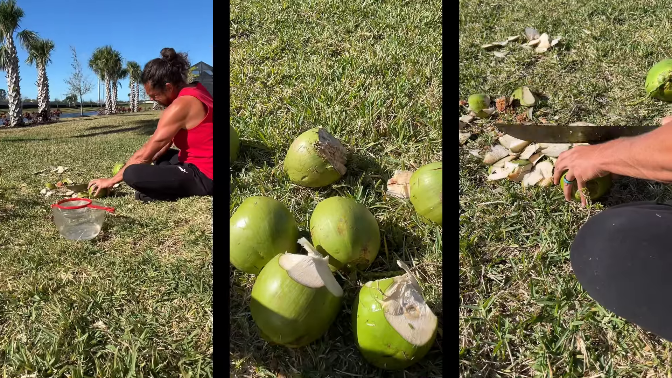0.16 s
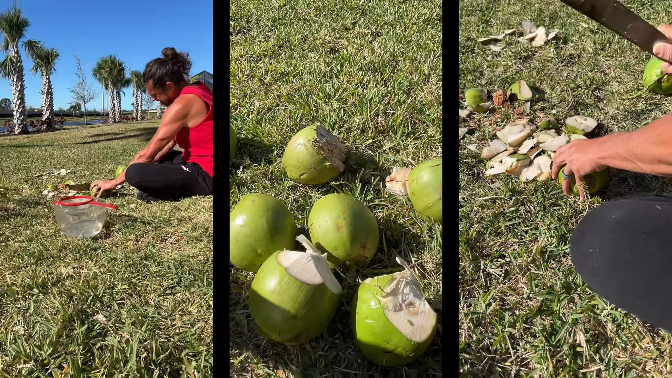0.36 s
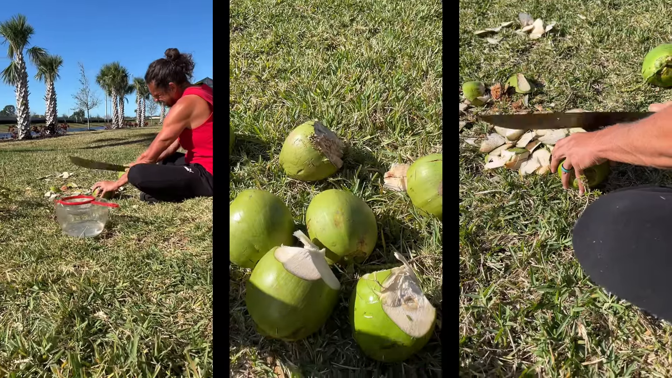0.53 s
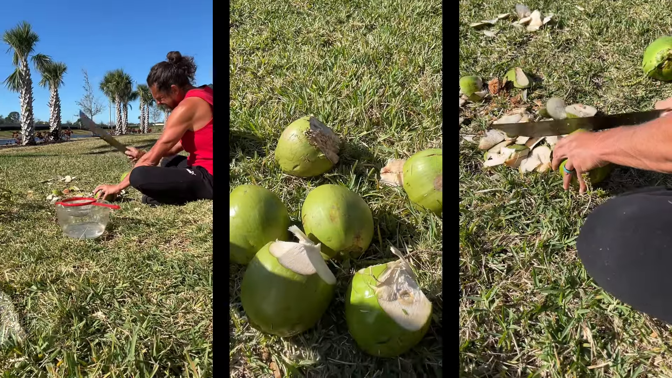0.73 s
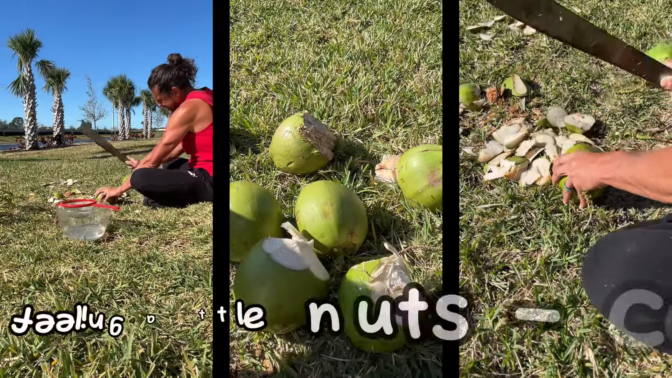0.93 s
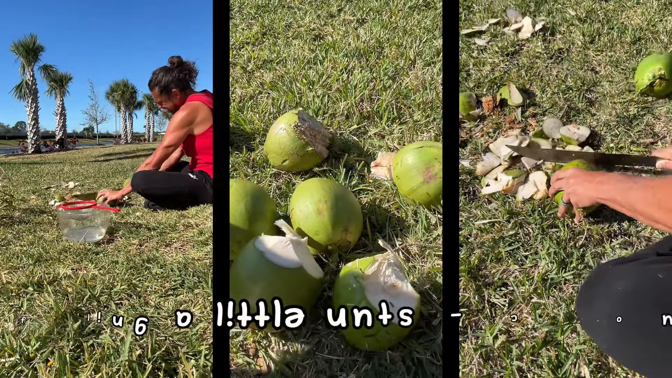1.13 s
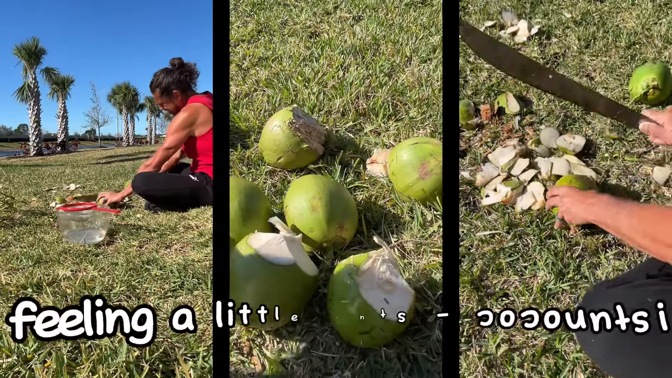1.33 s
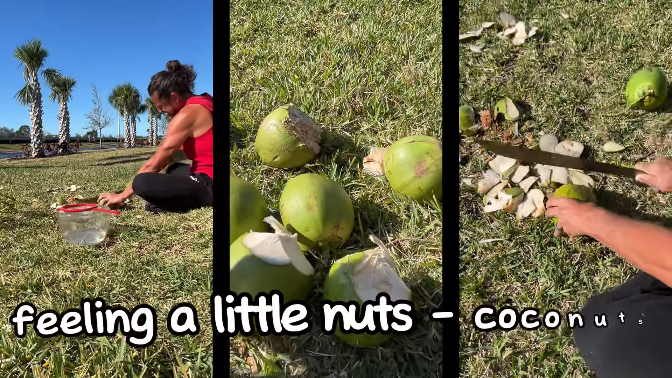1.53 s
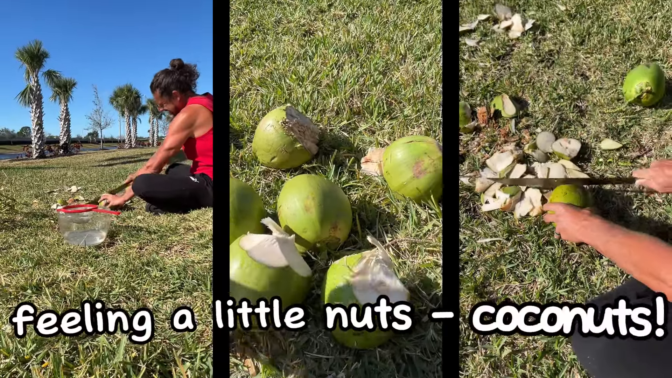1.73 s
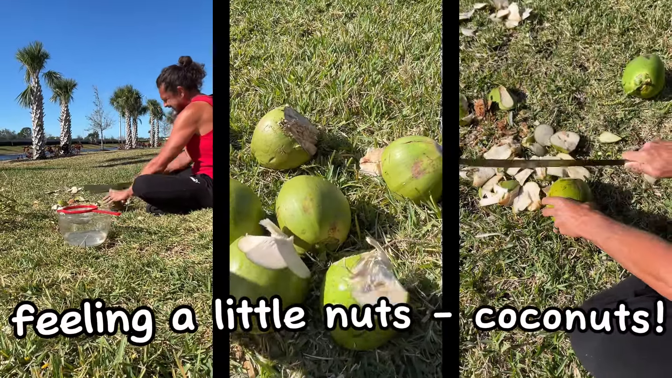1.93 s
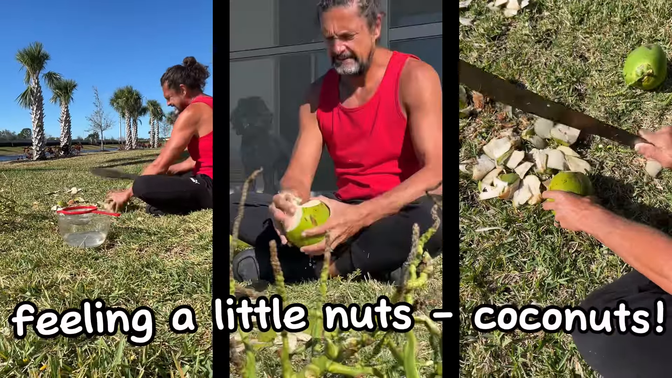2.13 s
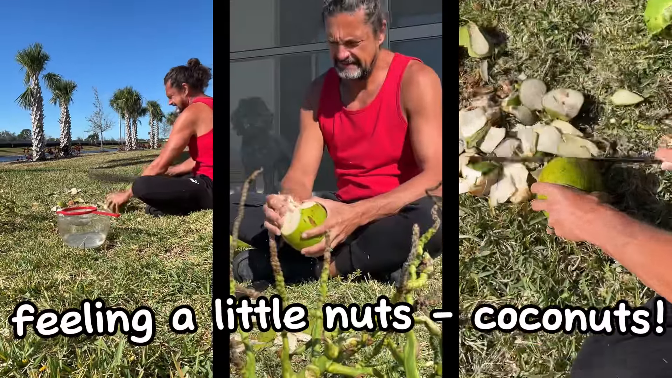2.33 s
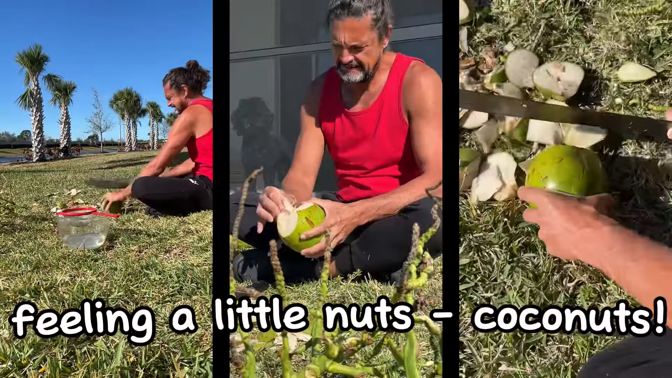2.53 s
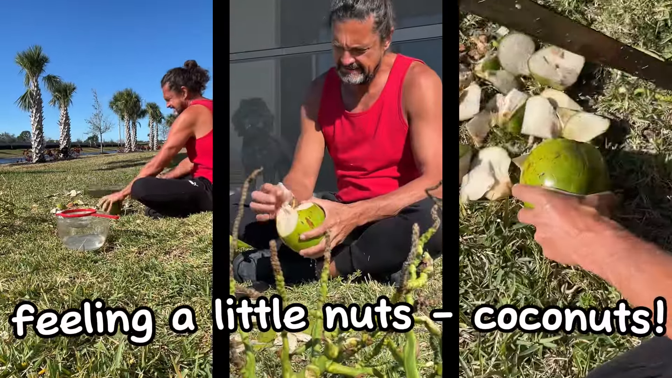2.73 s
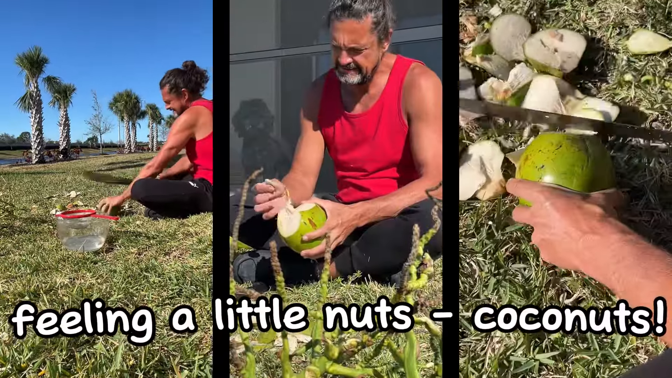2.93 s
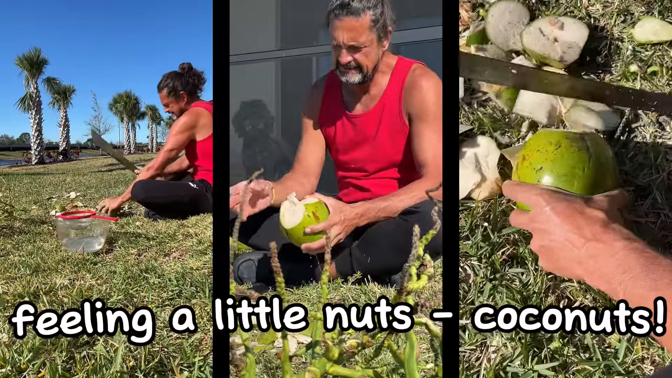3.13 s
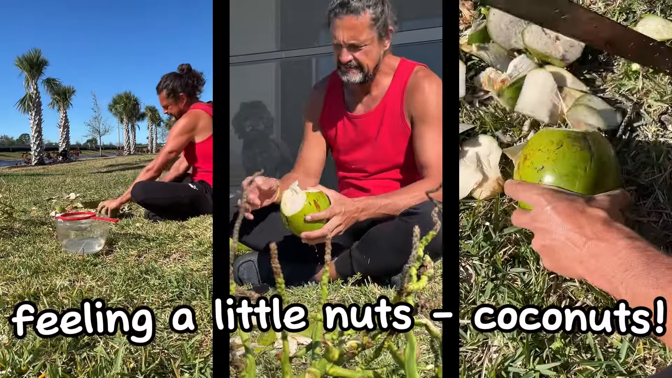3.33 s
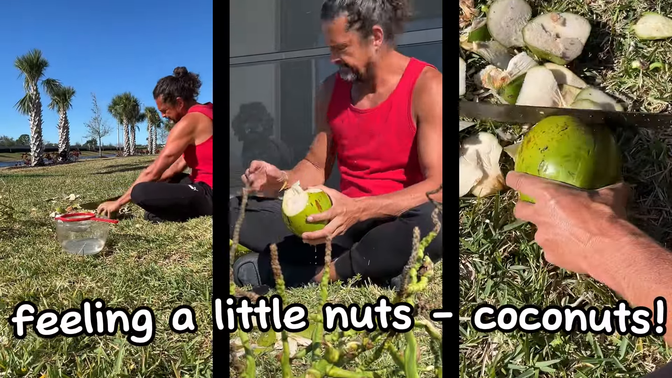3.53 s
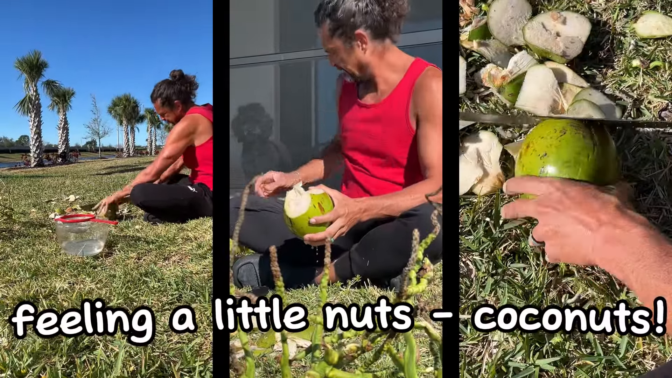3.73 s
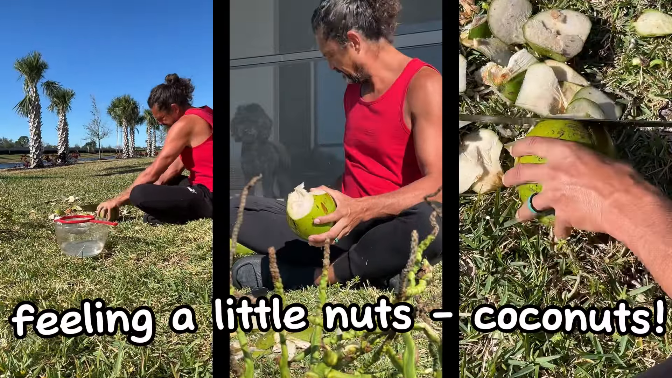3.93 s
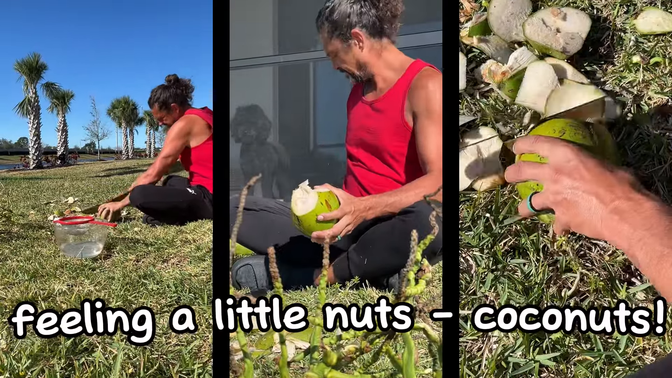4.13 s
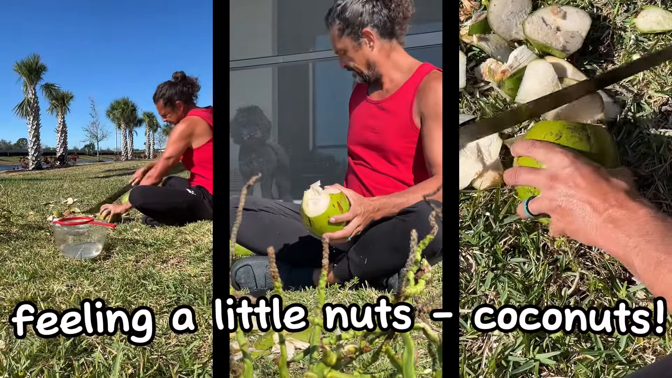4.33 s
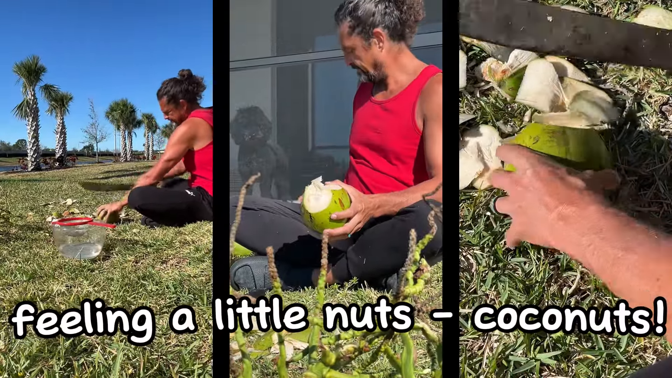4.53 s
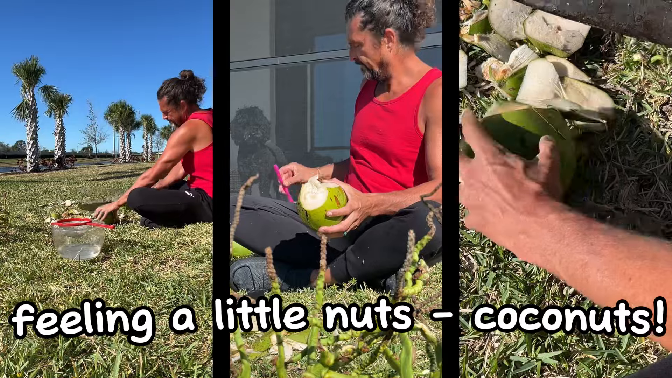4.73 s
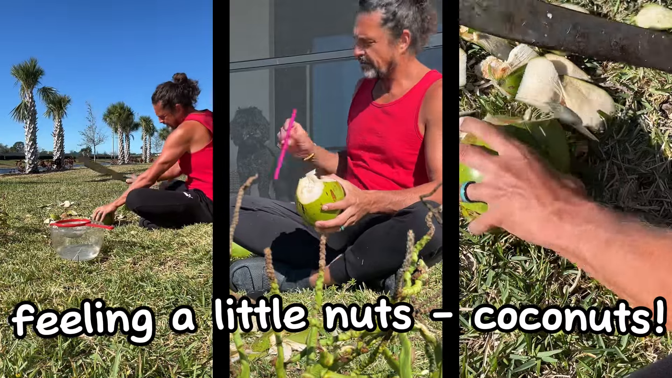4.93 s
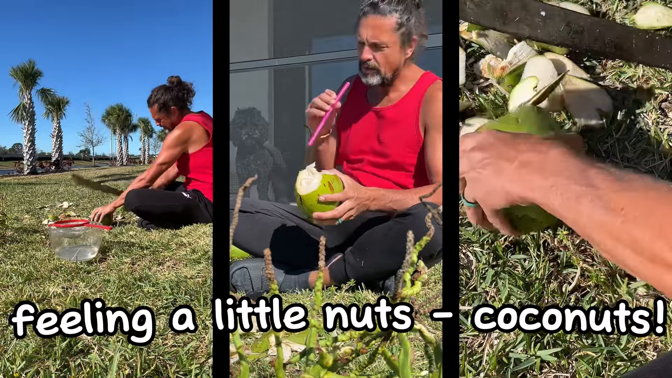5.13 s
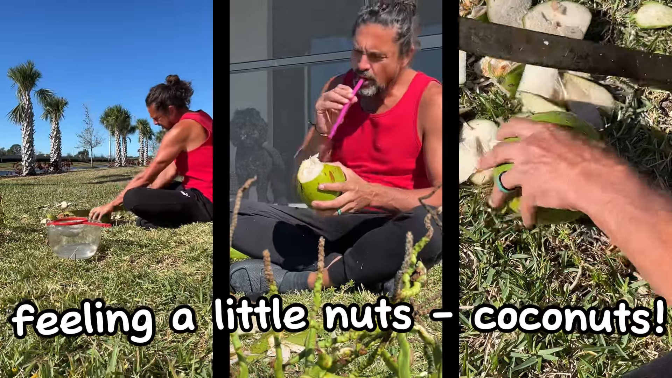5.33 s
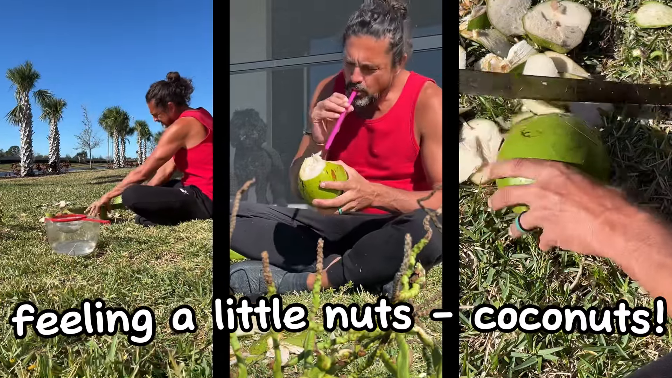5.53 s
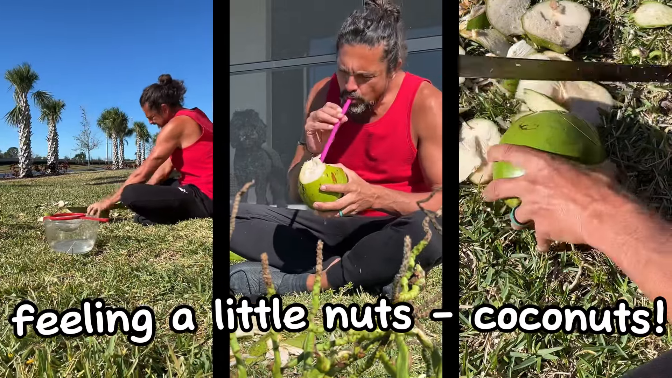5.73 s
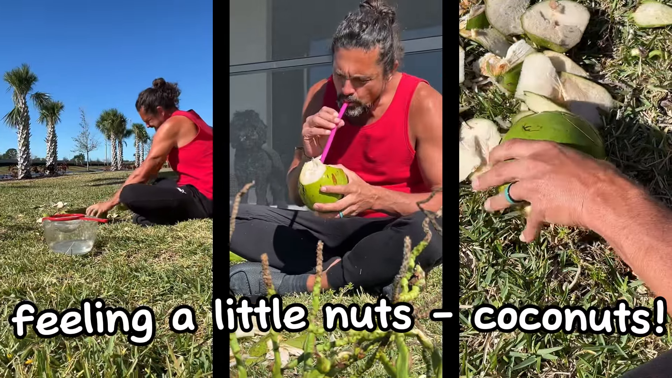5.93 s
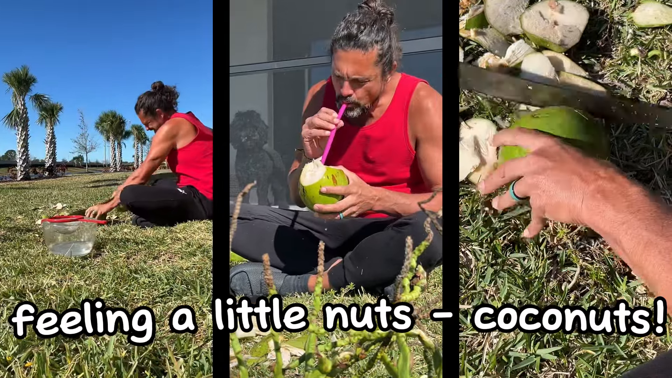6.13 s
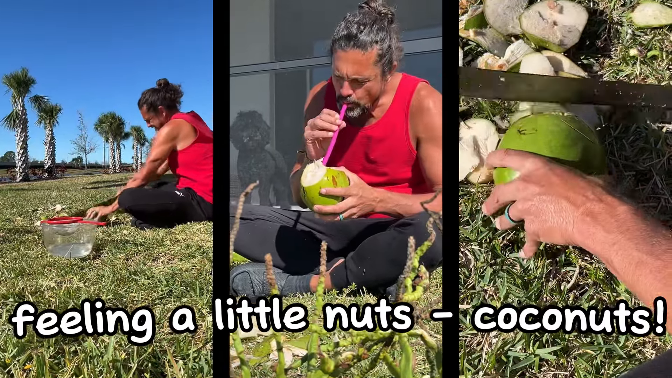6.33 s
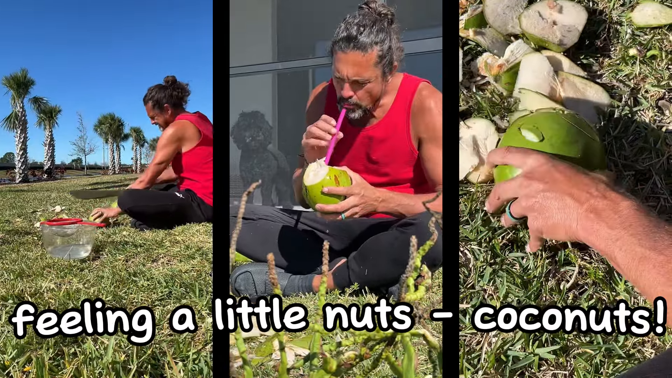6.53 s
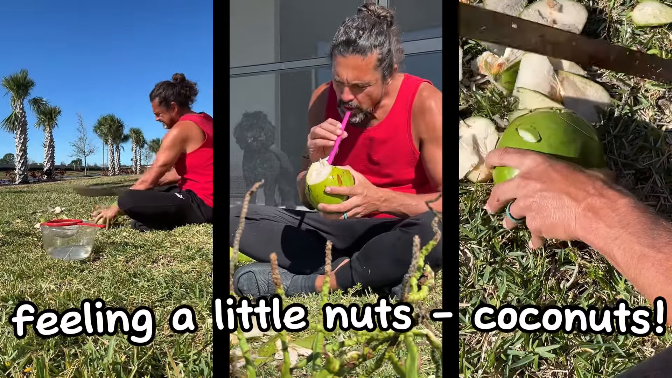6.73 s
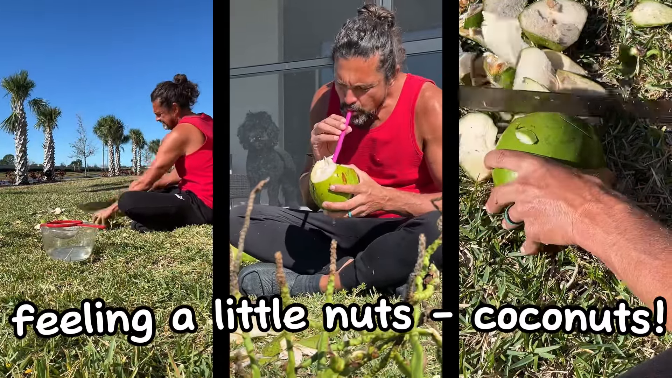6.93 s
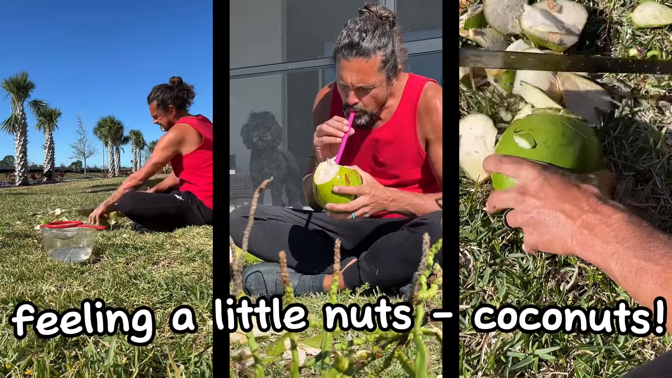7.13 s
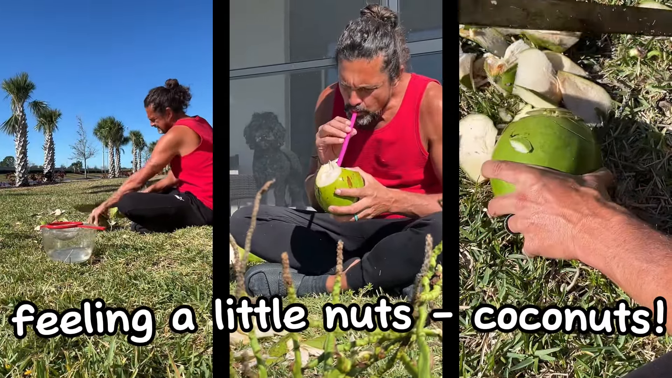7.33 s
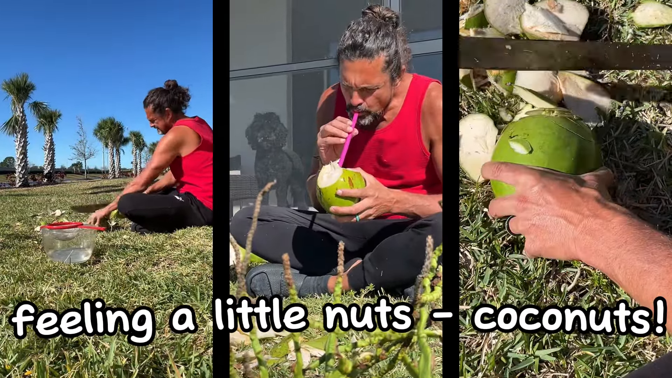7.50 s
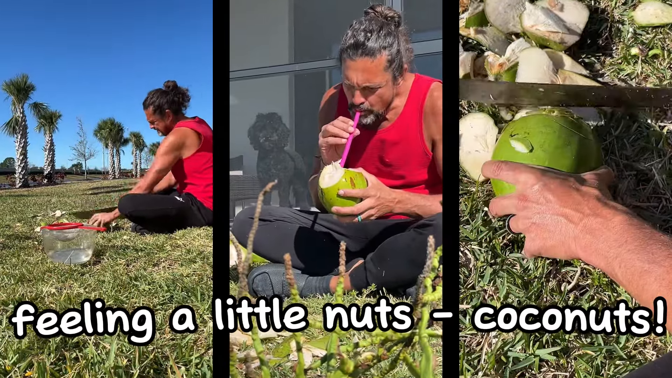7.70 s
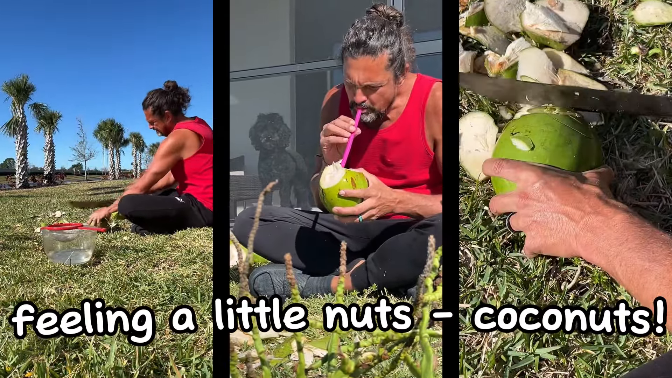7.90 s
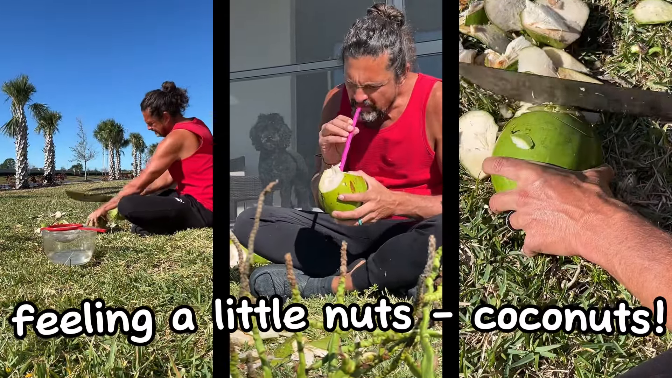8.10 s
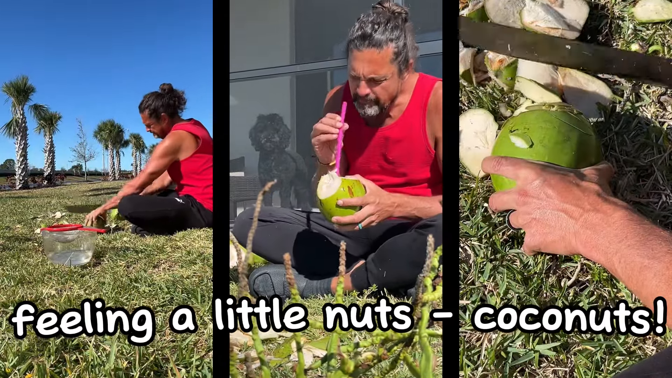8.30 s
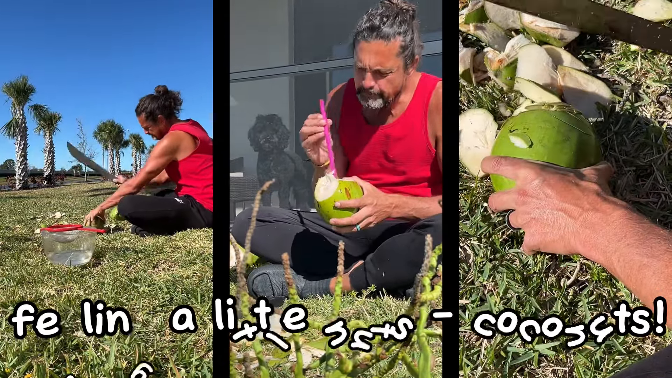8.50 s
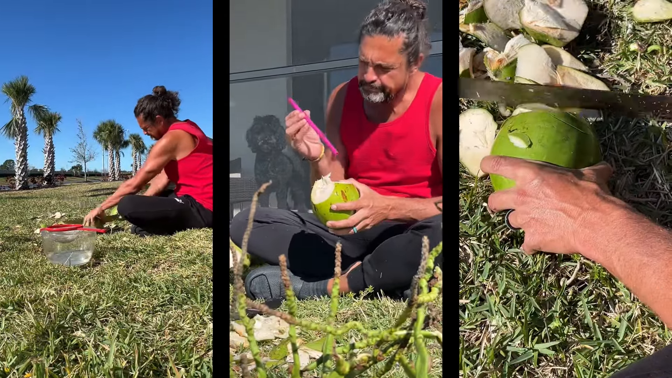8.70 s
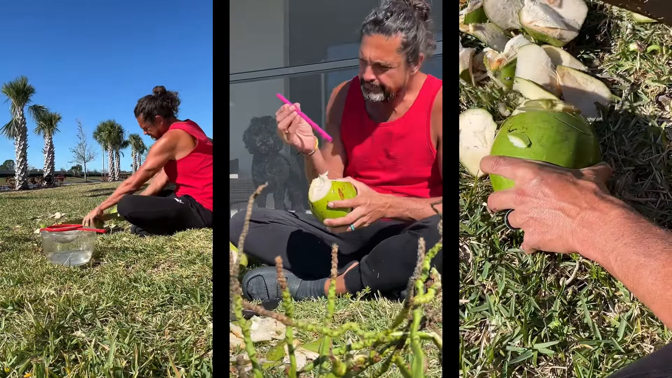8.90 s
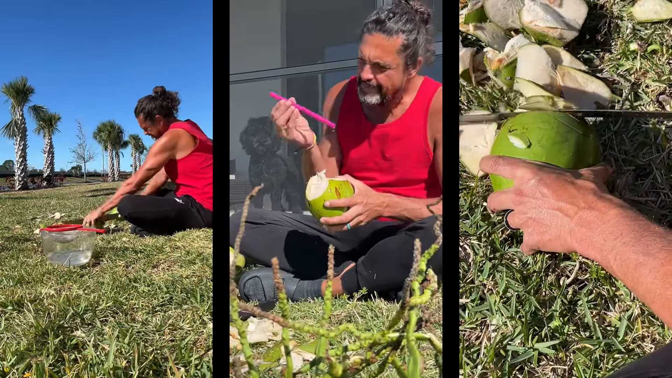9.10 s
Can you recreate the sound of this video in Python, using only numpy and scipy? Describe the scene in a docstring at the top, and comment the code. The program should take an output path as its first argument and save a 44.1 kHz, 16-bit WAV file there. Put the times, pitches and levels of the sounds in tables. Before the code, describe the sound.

A machete chops a green coconut on grass, close to the microphone, over a low wind rumble and soft outdoor hiss. Each strike is a short crunch of snapping fibres with a hollow knock. Two quick chops open, followed by a hard one at 0.5 seconds, a lighter pair around 1, and another hard one at 1.6. More land at 2.3, 2.9, 3.3 and 3.4, with the nut thudding against the ground. From 4 to 5 seconds, chips rustle and tick quietly. A light chop comes at 5.2, a firmer one with a faint steel ring at 6.1, and a hard one at 6.8. Wind buffets the microphone from 7.3 to 7.8 while the blade chatters and rings faintly. Light cuts follow around 8.7, then a last hard, hollow chop at 9.1. Very faint distant hums come and go.

```python
"""A steel machete chops green coconut husks on a lawn, close to a two-port phone microphone.
Each chop bites the skin, then wedges the husk apart: surges of snapping fibres that knock the hollow nut.
Some blows ring the blade or rock the nut against the ground, and chips break away, tick and rustle.
Underneath, wind rumbles on the microphone and faint hums come and go in a soft outdoor hiss.
"""
import sys
import numpy as np
from scipy import signal
from scipy.fft import rfft, irfft, next_fast_len
from scipy.io import wavfile
from scipy.ndimage import uniform_filter1d

SR = 44100
rng = np.random.default_rng(int(sys.argv[2]) if len(sys.argv) > 2 else 0)


def dump_mix(stems):
    """Bounce the given channels to the path in sys.argv[1] as a 16-bit WAV at rate SR."""
    frames = np.atleast_2d(stems).T  # one column per channel
    limited = np.clip(frames, -1, 1)  # hard clip at full scale
    pcm = np.round(limited * 32767).astype(np.int16)
    wavfile.write(sys.argv[1], SR, pcm)


N = 403779

# The hollow nut's modes. Each row: pitch in Hz, level in dB, time to fall 60 dB in seconds.
NUT_MODES = [(179.3, 0, 0.049), (313, -2, 0.042), (519.4, -2.5, 0.039), (729.5, 2, 0.025), (1177, 0, 0.022),
             (1690, -2.5, 0.012), (2260, -4, 0.03), (2834, 7, 0.035)]


def gain_of(db):
    """Decibels to a factor."""
    return 10 ** (np.asarray(db) / 20)


def unit_rms(x):
    """Scales to rms 1."""
    return x / np.sqrt(np.mean(x ** 2) + 1e-20)


def spectrum_at(points, hz):
    """Reads a spectrum table at hz, along a log frequency axis."""
    f, value = np.transpose(points)
    return np.interp(np.log(hz + 1), np.log(f + 1), value)


def envelope(points):
    """Joins (seconds, value) points with straight lines across the scene."""
    return np.interp(np.arange(N) / SR, *np.transpose(points))


def add(mix, start, sound):
    """Mixes a sound in at start seconds."""
    part = mix[round(start * SR):][:len(sound)]
    part += sound[:len(part)]


def coloured(x, eq):
    """Minimum-phase EQ that keeps the level of white noise."""
    log_gain = np.log(gain_of(spectrum_at(eq, abs(np.fft.fftfreq(4096, 1 / SR)))))
    taps = np.fft.ifft(np.exp(np.conj(signal.hilbert(log_gain)))).real[:1024]
    return signal.oaconvolve(x, taps / np.linalg.norm(taps))[:len(x)]


def resonate(x, hz, width_hz):
    """Band-pass: shifts hz down to zero, smooths twice and shifts back."""
    carrier = np.exp(2j * np.pi * np.cumsum(hz * np.ones(x.shape[-1])) / SR)
    pole = np.exp(-np.pi * width_hz / SR)
    return 2 * (carrier * signal.lfilter([1], np.poly([pole, pole]), x / carrier)).real


def struck(modes, tilt_db, spread_db, detune, swell_hz):
    """A body's decaying modes after one blow; where it lands changes their shares."""
    hz, db, t60 = np.transpose(modes)[:, :, None]
    t = np.arange(SR // 2) / SR
    level_luck, pitch_luck = rng.standard_normal((2, len(modes), 1))
    db = db + tilt_db * np.log2(hz / hz.mean()) + spread_db * level_luck
    swell = (1 - np.exp(-t * hz ** 2 / swell_hz)) ** 2  # low modes take longer to get going
    tones = np.sin(2 * np.pi * hz * (1 + detune * pitch_luck) * t)
    return (gain_of(db - 60 * t / t60) * swell * tones).sum(0)


def snaps(samples, per_s, spread_db):
    """A dense hail of clicks of uneven size."""
    hit, size, sign = rng.random((3, samples))
    strength = gain_of(-spread_db * np.log(size + 0.00041))
    return unit_rms((hit < per_s / SR) * strength * np.sign(sign - .5))


def hiss():
    """Soft, patchy background hiss, alike in left and right in some frequency bands, wide in others."""
    # Tone of the hiss. Each row: frequency in Hz, level in dB.
    eq = [(60, -10.5), (200, -11.5), (400, -15), (800, -14), (2000, -17), (5000, -20), (6500, -26.5),
          (12300, -28), (13500, -38), (14200, -48)]
    # Its slow fade. Each row: time in seconds, level in dB.
    fade = [(0.0, -47.5), (8.64, -52.5), (9.16, -52.5)]
    # Each row: frequency in Hz, left-right correlation from wide (0) to identical (1).
    band_correlation = [(100, 1), (300, 0.63), (700, 0.56), (1800, 0.2), (3000, 0.33), (5000, 0.33),
                        (6100, 1), (7500, 0.11), (8500, .99), (9600, 0.86), (10800, 0.21), (12000, 1),
                        (15000, 1)]
    frames, hz = N // 256 + 5, np.fft.rfftfreq(1024, 1 / SR)
    left_re, left_im, apart_re, apart_im, patches = rng.standard_normal((frames, 513, 5)).T
    patches = unit_rms(uniform_filter1d(uniform_filter1d(patches, 12, 0), 14, 1))
    shared = spectrum_at(band_correlation, hz)[:, None]
    left = left_re + 1j * left_im
    right = shared * left + np.sqrt(1 - shared ** 2) * (apart_re + 1j * apart_im)
    spectra = np.array([left, right]) * gain_of(spectrum_at(eq, hz)[:, None] + 1.1 * patches)
    noise = signal.istft(spectra, nperseg=1024, noverlap=768)[1][:, :N]
    return gain_of(envelope(fade)) * unit_rms(noise)


def hums():
    """Fuzzy far tones: narrow bands of noise that fade in and out."""
    # Each row is a hum: start and end in seconds, pitch and width in Hz, level in dB.
    tones = [(1.194, 2.2, 664, 120, -63), (3.435, 4.96, 660, 120, -62), (5.195, 5.664, 873, 140, -59),
             (7.163, 7.614, 867, 90, -58.5), (7.499, 7.75, 805, 170, -54)]
    out = np.zeros(N)
    for start, end, hz, width_hz, db in tones:
        noise = rng.standard_normal(2 * SR)[:round((end - start) * SR)]
        tone = unit_rms(resonate(noise, hz, width_hz))
        add(out, start, gain_of(db) * tone * signal.windows.tukey(len(tone), .4))
    return out


def wind():
    """Low lumpy rumble, brighter buffeting and single puffs; the eddies differ a little per port."""
    # Strength of the wind. Each row: time in seconds, rumble level in dB.
    strength = [(0.0, -50), (0.12, -47.5), (3.57, -43), (7.09, -44), (7.4, -37), (7.75, -37.5),
                (7.95, -44.5), (8.85, -44), (9.16, -39.5)]
    # Puffs that rock the membrane. Each row: start in seconds, level in dB, pitch in Hz,
    # length in cycles, overtones from 0 to 1.
    puff_cues = [(.513, -31.5, 112, 1.4, 0.5), (1.734, -31.5, 71, 2.8, 0.05), (3.999, -31, 70, 3.1, 0.06),
                 (7.327, -19.5, 74.8, 4, 0.78), (7.38, -21.5, 81, 1.7, 0), (7.55, -34, 94, 1.8, 0.26),
                 (7.657, -23, 91, 1.48, 0), (7.752, -34.5, 127.4, 2.6, 1)]
    eddies = rng.standard_normal((2, 1, N)) + 0.095 * rng.standard_normal((2, 2, N))
    rumble = unit_rms(resonate(eddies[0], hz=68.7, width_hz=58.3))
    buffet = unit_rms(resonate(eddies[1], hz=126, width_hz=105))
    bed = gain_of(envelope(strength)) * (rumble + gain_of(-7.5) * buffet)
    puffs = np.zeros(N)
    for start, db, hz, cycles, richness in puff_cues:
        phase = 2 * np.pi * hz * np.arange(0, cycles / hz, 1 / SR)
        overtones = sum(np.exp(-k * phase / 30) * 0.75 ** (k - 2) * np.sin(k * phase + 1.56 * (k - 1))
                        for k in range(2, 7))
        swing = np.sin(phase) + richness * overtones
        add(puffs, start, gain_of(db) * swing * signal.windows.tukey(len(phase), .6))
    left_puffs = np.roll(puffs, round(.0007 * SR))  # a puff sweeps over the right port first
    return bed + np.array([left_puffs, puffs])


def rustles():
    """Chips and grass, moved by hand or blade, give dry clicks in clumps."""
    # Each row is a rustle: start and length in seconds, level in dB.
    moves = [(0.78, 0.22, -54.5), (1.677, 0.23, -52.5), (2.914, 0.15, -54.5), (3.995, 0.22, -44.5),
             (5.138, 0.2, -51), (6.267, 0.092, -54.5), (7.56, 0.31, -55)]
    # Tone of the rustle. Each row: frequency in Hz, level in dB.
    eq = [(500, -11), (1500, 3.5), (3900, 9), (6000, 1), (11000, 6), (13500, 1), (15500, -9)]
    rise_share = 0.34
    level = sum(gain_of(db) * envelope([(s, 0), (s + rise_share * length, 1), (s + length, 0)]) ** .5
                for s, length, db in moves)
    clumps = gain_of(2.0 * unit_rms(uniform_filter1d(rng.standard_normal(N), 200)))
    return level * unit_rms(coloured(clumps * snaps(N, per_s=6000, spread_db=2.0), eq))


def ticks():
    """Chips and stalks tick: a few damped cycles with a spit of noise around the same pitch."""
    # Each row is a tick: start in seconds, level in dB, pitch in Hz.
    cues = [(0.357, -28.5, 1830), (0.897, -32.5, 4130), (0.97, -35, 7900), (0.976, -36, 5170),
            (1.145, -32, 3340), (1.467, -38, 4600), (2.387, -33, 1090), (4.292, -30, 2230),
            (4.711, -37, 1220), (5.302, -41, 6100), (7.497, -39.5, 6000), (7.555, -39, 5000),
            (7.68, -33, 11200)]
    out, t = np.zeros(N), np.arange(SR // 50) / SR
    attack = 1 - np.exp(-t / 0.00036)
    for start, db, hz in cues:
        spit = 0.86 * unit_rms(resonate(rng.standard_normal(len(t)), hz, 1.47 * hz))
        partials = sum(np.sin(2 * np.pi * ratio * hz * t) for ratio in (.55, .78, 1.02, 1.3)) / 2
        add(out, start, gain_of(db - 60 * t / 0.012) * attack * (partials + spit))
    return out


def blade_chatter():
    """The resting blade chatters faintly: a quick run of tiny high knocks, accented at the start."""
    start_s, end_s, per_s, db, hz = 7.313, 7.46, 51.5, -47, 9000
    out, t = np.zeros(N), np.arange(SR // 100) / SR
    for s, (size, pitch) in zip(np.arange(start_s, end_s, 1 / per_s), rng.standard_normal((20, 2))):
        level_db = db + 4.4 * np.exp(-(s - start_s) / .015) + 1.5 * size
        tone = np.sin(2 * np.pi * hz * (1 + .03 * pitch) * t)
        add(out, s, gain_of(level_db - 60 * t / 0.0078) * tone)
    return out


def blade_ring():
    """The steel rings on after a blow, most near the pitch that the blow favours."""
    # Each row is a blow: start in seconds, level in dB, contact from edge (0) to flat (1),
    # favoured pitch in Hz, freedom to ring on from 0 to 1.
    blows = [(.066, -52.5, 0, 2500, .22), (0.59, -57, 0, 2500, 0.16), (3.414, -58, 0, 2500, 0.2),
             (6.111, -49, 0, 2500, 1), (6.301, -50, .7, 3500, 1), (6.79, -57, 0, 2500, 0.7),
             (7.588, -40, 0.9, 7500, .55), (7.683, -44, 1, 8800, 1), (7.756, -51, .9, 3700, 1),
             (8.207, -50, 0.9, 8800, 0.2), (8.622, -47, .8, 8000, .5)]
    # The pitch of each blade mode in Hz.
    mode_hz = [2498, 2501.5, 2990, 3528, 4590, 5105, 6535, 7243, 8008, 8790, 9605, 10450, 11285, 13730,
               15180]
    # The same modes. Each row: level in dB struck on the edge, level in dB struck on the flat,
    # time to fall 60 dB in seconds when ringing freely.
    mode_response = [(3, -8, 1.1), (0, -10, 1.1), (-20, -6, 0.3), (-12, -4, 0.3), (-14, -7, .3),
                     (-20, -7, 0.3), (-10, -12, .35), (-10, -9, 0.3), (-15, -12, 0.35), (-25, 8, 0.17),
                     (-8, -7, 0.2), (-20, -3, 0.13), (-15, -3, 0.11), (-5, -3, .15), (-15, -10, .15)]
    edge_db, flat_db, t60 = np.transpose(mode_response)
    focus_db_per_octave = 6.0
    out = np.zeros(N)
    for start, db, flat, favoured_hz, freedom in blows:
        octaves_away = abs(np.log2(np.divide(mode_hz, favoured_hz)))
        mode_db = edge_db + flat * (flat_db - edge_db) - focus_db_per_octave * octaves_away
        modes = np.transpose([mode_hz, mode_db, freedom * t60])
        add(out, start, gain_of(db) * struck(modes, 0, spread_db=3.5, detune=0.00016, swell_hz=8000))
    return out


def nut_thuds():
    """The nut rocks against the ground: soft blows that wake its low, hollow modes."""
    # Each row is a thud: start in seconds, peak in dB, brightness in dB per octave.
    cues = [(0.173, -27, -1), (0.565, -35, -33), (2.873, -27.5, -5), (2.908, -28, 9), (3.264, -29, -4),
            (3.413, -28.5, -7.5), (4.296, -43, 6), (4.712, -37, -6.5), (5.187, -29, -5), (6.118, -29, -4),
            (6.298, -52, 8), (6.775, -28.5, -3), (7.555, -38, -1), (7.761, -32, -15), (9.126, -29, -29)]
    out, soft_blow = np.zeros(N), np.hanning(60)
    for start, db, tilt_db in cues:
        ring = struck(NUT_MODES, tilt_db, spread_db=5.0, detune=0.042, swell_hz=423)
        knock = signal.oaconvolve(soft_blow, ring)
        add(out, start, gain_of(db) * knock / abs(knock).max())
    return out


def fibre_surge(db, length, t60, treble_db, knock_db, knock_hz, crack_db):
    """One burst of snapping fibres: feeds for its body, treble and crack, and its knock on the nut."""
    parting_t60_s, strands_db, focus_db_per_octave = 0.013, -13, 5.0
    t = np.arange(SR // 10) / SR
    # The tearing stops quickly; loose strands crackle on below it.
    parting = gain_of(-60 * np.maximum(t - length, 0) / parting_t60_s) + gain_of(strands_db)
    attack = 1 - np.exp(-t / 0.0018)
    tear = gain_of(-60 * t / t60) * parting * attack * snaps(len(t), per_s=12000, spread_db=1.84)
    shove = np.exp(-t / 0.00014) + 0.079 * tear * np.exp(-t / 0.011)  # first contact, then the tearing
    modes = [(hz, mode_db - focus_db_per_octave * abs(np.log2(hz / knock_hz)), decay)
             for hz, mode_db, decay in NUT_MODES]
    knock = signal.oaconvolve(shove, struck(modes, 0, spread_db=3.5, detune=0.04, swell_hz=685))
    return (gain_of(db) * tear, gain_of(db + treble_db) * tear, gain_of(db + crack_db) * tear,
            gain_of(db + knock_db) * knock / abs(knock).max())


def chops():
    """The edge bites the skin, then wedges the husk apart; snapping fibres sound and shake the nut."""
    # Each row is a chop: start in seconds, bite level in dB, wait for the wedge in seconds, wedge
    # level in dB, its tearing time in seconds, relative treble in dB, the bite's relative knock in dB,
    # favoured pitch of the nut in Hz, the wedge's relative skin crack in dB.
    strokes = [ (0.0592, -24.5, 0.0061, -22.5, 0.0043, 1, -0.5, 497, -39),
               (0.1531, -20, 0.005, -29.5, 0.024, -4, -4, 700, -20.5),
               (0.548, -14.5, 0.0052, -19.5, 0.0089, 0.5, -3.5, 580, -27),
               (1.0152, -26, 0.0099, -30, 0.0069, 1.5, 1, 700, 4.5),
               (1.09, -23, 0.0034, -23, 0.03, 5.5, -2, 280, -1.5),
               (1.561, -13, 0.0064, -15.5, 0.0044, -2.5, 2, 1190, -2.5),
               (2.3268, -21, 0.0095, -17, 0.01, -1, -1.5, 1300, -6.5),
               (2.863, -20, 0.0048, -23, 0.0041, 5.5, 6, 640, -5),
               (3.2537, -22.5, 0.0081, -24.5, 0.0021, -4, -2.5, 403, -5.5),
               (3.4042, -16, 0.005, -23.5, 0.011, 1, 3.5, 1010, -13),
               (5.177, -26, 0.0052, -30, 0.0031, 3.5, 4.5, 735, -6),
               (6.11, -17, .004, -29, 0.0025, 1, 4, 990, -10),
               (6.766, -13, 0.0065, -23, 0.016, 1, 1.5, 860, -8),
               (7.587, -33, 0.0023, -40.5, 0.0039, 7, -5, 1200, -3),
               (8.617, -37.5, 0.005, -38, 0.031, 4, 3, 500, -21),
               (8.702, -28.5, 0.0059, -35.5, 0.024, -4.5, 2, 550, -18),
               (9.1056, -27, 0.0089, -13.5, 0.0053, -4.5, 6.5, 506, -12)]
    # Cut pieces that break away or drop. Each row: start in seconds, level in dB, length in seconds,
    # relative treble in dB.
    chips = [(0.569, -32.5, 0.028, -9), (0.582, -40.5, 0.0017, 17), (1.588, -49, .012, 3),
             (1.599, -45.5, 0.0028, 18), (2.901, -37, 0.035, 4.5), (3.277, -40, 0.0032, -18),
             (3.432, -40, 0.0032, 10), (4.08, -50, .006, 7), (4.133, -45, 0.023, 5),
             (6.144, -42.5, 0.013, -11), (6.796, -41, 0.073, 1.5), (8.205, -43, 0.0054, -0.5)]
    # The body of a snap. Each row: frequency in Hz, level in dB.
    body_eq = [(200, -9), (500, -0.5), (1300, -1.5), (2100, -1.5), (3500, 2), (4500, -5.5), (6500, -1.5),
               (9000, -17.5)]
    # Its fizzing treble. Each row: frequency in Hz, level in dB.
    treble_eq = [(3500, -13), (5500, -1), (8500, -1.5), (10000, -4), (12000, 3), (13500, -6.5),
                 (15500, -20.5)]
    bite_share, bite_t60_s, wedge_t60_s = 0.63, 0.062, 0.099
    surges = []
    for start, bite_db, wait, wedge_db, length, treble_db, knock_db, knock_hz, crack_db in strokes:
        bite = fibre_surge(bite_db, bite_share * wait, bite_t60_s, treble_db,
                           knock_db, knock_hz, crack_db - 13.5)
        wedge = fibre_surge(wedge_db, length, wedge_t60_s, treble_db, knock_db - 4, knock_hz, crack_db)
        surges += [(start, bite), (start + wait, wedge)]
    for start, db, length, treble_db in chips:
        chip = fibre_surge(db, length, 0.12, treble_db, knock_db=-15, knock_hz=800, crack_db=-15)
        surges.append((start, chip))
    body, treble, skin, nut = np.zeros((4, N))
    for start, feeds in surges:
        for bus, feed in zip((body, treble, skin, nut), feeds):
            add(bus, start, feed)
    split = resonate(signal.unit_impulse(1024), hz=3690, width_hz=2020)  # tough skin splits brightly
    cracks = signal.oaconvolve(skin, split / np.linalg.norm(split))[:N]
    return coloured(body, body_eq) + coloured(treble, treble_eq) + cracks + nut


def scene():
    """Near sounds reach both ports alike, with a little scatter off the grass and husks."""
    near = chops() + nut_thuds() + ticks() + blade_chatter() + blade_ring() + rustles()
    scatter = rng.standard_normal((2, 600)) * np.exp(-np.arange(600) / 100.0)
    scatter /= np.linalg.norm(scatter, axis=1, keepdims=True)
    reflections = gain_of(-12.0) * signal.oaconvolve(near[None], scatter, axes=1)[:, :N]
    return near + reflections + wind() + hums() + hiss()


def record(dry):
    """The port pair turns phase and balance by frequency; a bass cut and a band limit follow."""
    # Phase between the ports. Each row: frequency in Hz, lead of the left in half turns.
    lead = [(0, 0), (650, -.24), (1900, .05), (2700, .67), (4100, .16), (4800, .3), (5800, 1), (6400, 1),
            (8300, 2), (9900, 2.03), (11800, 3), (13600, 3), (14500, 4)]
    # Their balance. Each row: frequency in Hz, left over right in dB.
    balance = [(100, 0), (600, 1), (2000, 0), (4500, -.5), (7000, 0)]
    bass_cut_hz, band_limit_hz = 45, 16300
    size = next_fast_len(N + 2048)
    hz = np.fft.rfftfreq(size, 1 / SR)
    turn = np.exp(.5j * np.pi * np.interp(hz, *np.transpose(lead)))
    left = gain_of(spectrum_at(balance, hz) / 2) * turn  # each port takes half, in opposite directions
    bass_cut = 1 / np.sqrt(1 + (bass_cut_hz / (hz + 1)) ** 6)
    pair = irfft(rfft(dry, size) * bass_cut * np.array([left, 1 / left]), size)[:, :N]
    low_pass = signal.firwin(255, band_limit_hz, window=("kaiser", 7), fs=SR)
    return signal.oaconvolve(pair, low_pass[None], "same")


dry = scene()
out = record(dry)
dump_mix(out)
```